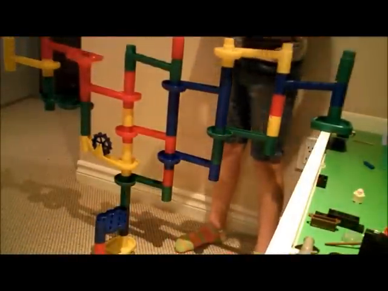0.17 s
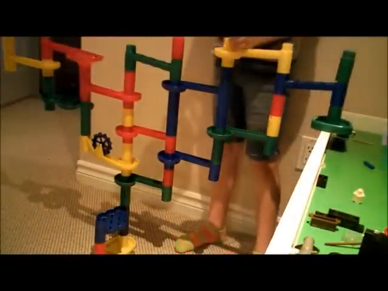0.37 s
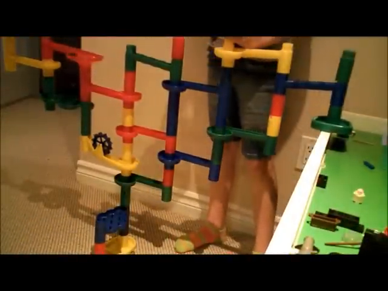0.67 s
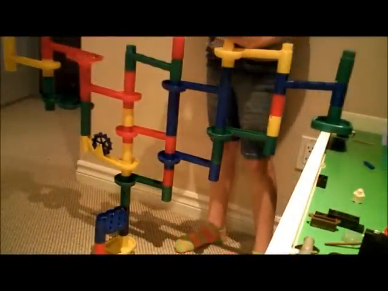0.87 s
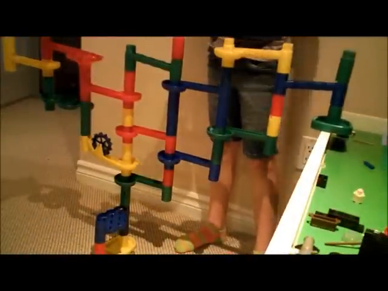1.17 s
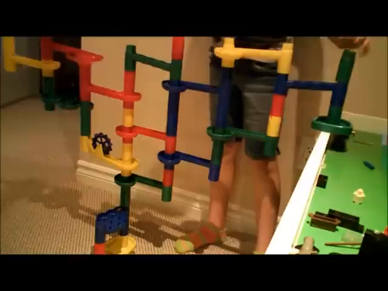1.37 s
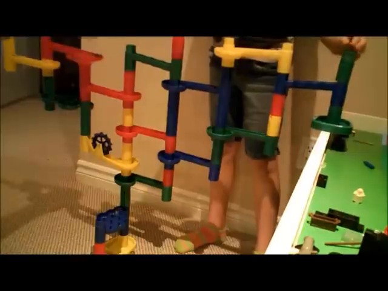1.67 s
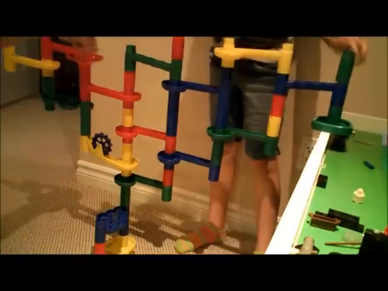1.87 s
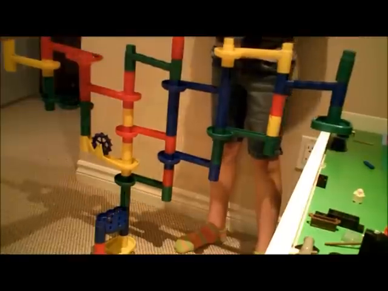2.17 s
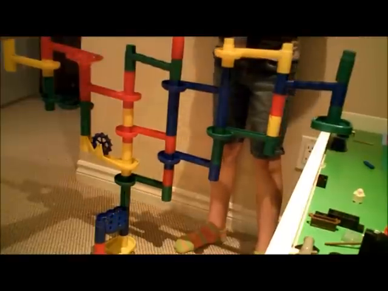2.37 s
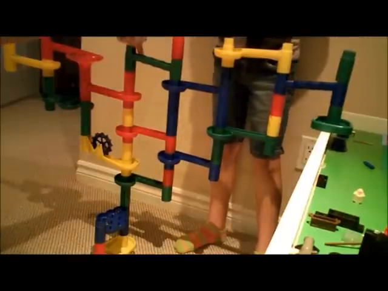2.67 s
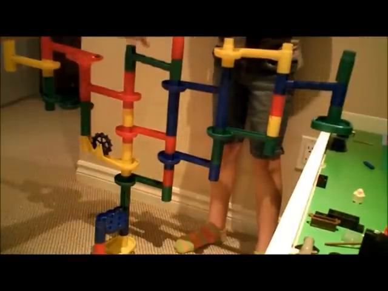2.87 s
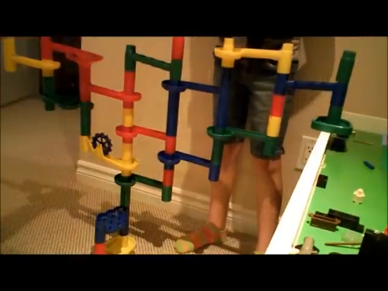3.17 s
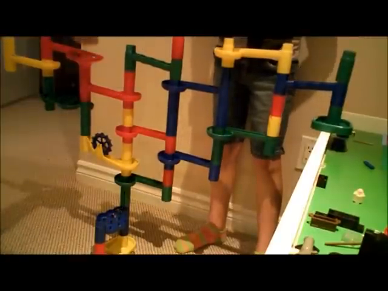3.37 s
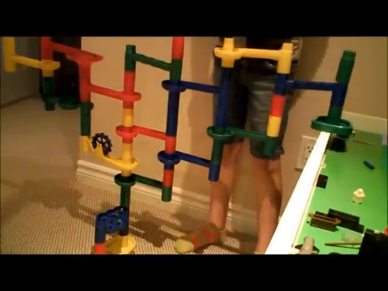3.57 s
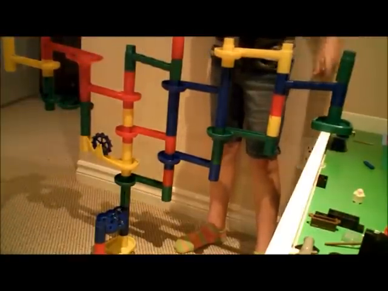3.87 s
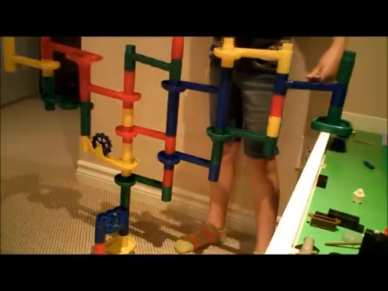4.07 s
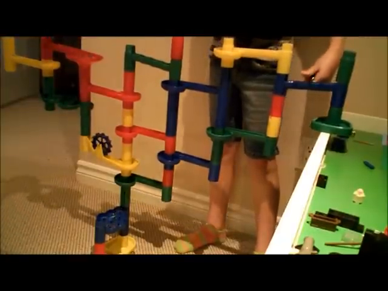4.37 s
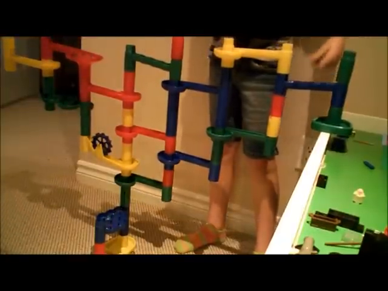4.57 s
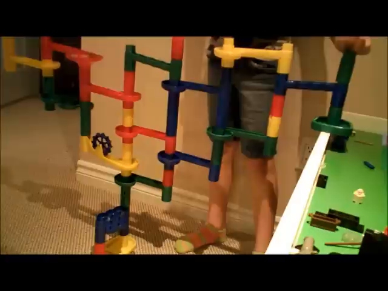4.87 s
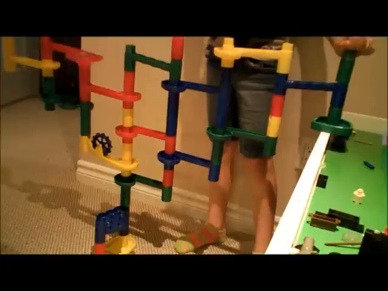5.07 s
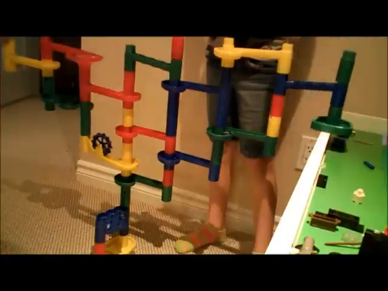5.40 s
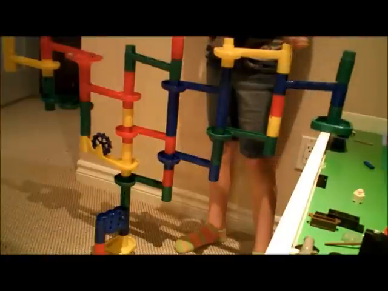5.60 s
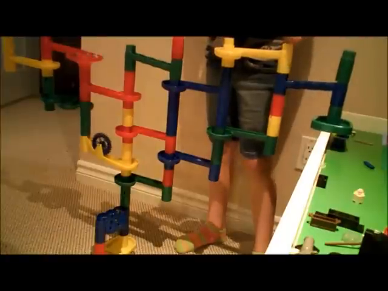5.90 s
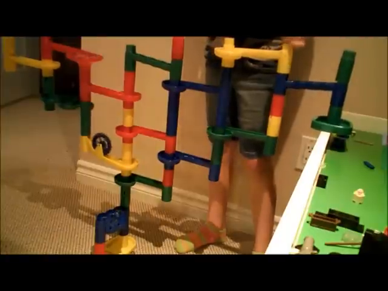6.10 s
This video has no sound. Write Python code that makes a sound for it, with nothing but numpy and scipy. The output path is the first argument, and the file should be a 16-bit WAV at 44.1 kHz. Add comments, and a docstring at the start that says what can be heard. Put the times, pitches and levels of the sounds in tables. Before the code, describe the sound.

Marbles clatter down a plastic marble run in a small room, with dense hollow knocks, glassy clicks and a soft rolling rumble.

```python
"""Marbles in a plastic tower

Marbles run down a plastic tower in a small carpeted room, heard through one camera microphone.
Rolling contact makes the chutes rumble and a bowl hum; light impacts chatter on the walls and click,
glass on glass. Drops through the tubes excite the plastic's modes in bouncing knocks. Now and then
a single mode thuds or pings, and stick-slip friction makes a joint squeak once."""
import sys
import numpy as np
from scipy import signal
from scipy.fft import rfft, irfft
from scipy.io import wavfile

SR = 44100
rng = np.random.default_rng(int(sys.argv[2]) if len(sys.argv) > 2 else 0)


def file_out(sig):
    """Save sig as 16-bit WAV at sys.argv[1]."""
    # one column per channel
    cols = np.atleast_2d(sig).T
    # limit, then scale
    lim = np.clip(cols, -1, 1)
    pcm = np.round(lim * 32767).astype(np.int16)
    wavfile.write(sys.argv[1], SR, pcm)


N = 275184
TIME = np.arange(N) / SR


def amp(db):
    """Decibels to amplitude ratio."""
    return 10 ** (np.asarray(db) / 20)


def unit_energy(x):
    """Normalise to an energy of one."""
    return x / np.sqrt(np.sum(x ** 2))


def unit_rms(x):
    """Normalise to an rms of one."""
    return x / np.std(x)


def band(x, hz, kind, order=2):
    """Butterworth filter."""
    return signal.sosfilt(signal.butter(order, hz, kind, fs=SR, output="sos"), x)


def response(spectrum, size=2048):
    """Minimum-phase impulse response of a (frequency [Hz], gain [dB]) curve, by cepstral folding."""
    hz, db = np.transpose(spectrum)
    bin_hz = np.fft.rfftfreq(size, 1 / SR)
    log_gain = np.log(amp(np.interp(np.log(bin_hz + 1), np.log(hz), db)))
    fold = np.r_[1, np.full(size // 2 - 1, 2), 1, np.zeros(size // 2 - 1)]
    return irfft(np.exp(rfft(irfft(log_gain) * fold)))


def through(x, impulse_response):
    """Convolution, cut to the length of x."""
    return signal.fftconvolve(x, impulse_response)[:len(x)]


def resonate(x, modes):
    """Forced response of parallel modes, each (frequency [Hz], bandwidth [Hz], gain [dB])."""
    return sum(amp(db) * signal.lfilter(*signal.iirpeak(hz, hz / width, fs=SR), x)
               for hz, width, db in modes)


def add(out, start_s, x):
    """Superpose x on out from start_s on."""
    start = max(int(start_s * SR), 0)
    out[start:start + len(x)] += x[:len(out) - start]


def contacts(per_s, spread_db):
    """Shot noise: tiny impacts of uneven size at random moments."""
    sizes = amp(spread_db * np.minimum(rng.standard_normal(N), 2)) * rng.choice([-1, 1], N)
    return unit_rms(sizes * (rng.random(N) < per_s / SR))


def dense_modes(energy, t60, rise_s):
    """Modal overlap: each input of energy becomes noise that builds as the waves spread, then decays."""
    power = signal.lfilter([1], [1, -np.exp(-2 * np.log(1000) / (t60 * SR))], energy)
    power = signal.lfilter([1], [1, -np.exp(-1 / (rise_s * SR))], power)
    return rng.standard_normal(len(power)) * np.sqrt(power * energy.sum() / power.sum())


def wander(x, modes, depth_db, moves_per_s):
    """Modal coupling depends on position: a moving marble favours now one mode, now another."""
    stops = np.arange(0, TIME[-1] + 1, 1 / moves_per_s)
    out = 0
    for mode in modes:
        coupling_db = depth_db * np.interp(TIME, stops, rng.uniform(-1.2, 1, len(stops)))
        out = out + amp(coupling_db) * resonate(x, [mode])
    return out


# spectrum of the still room: (frequency [Hz], relative level [dB])
ROOM_SPECTRUM = [(30, -12), (70, -15.5), (120, -1), (180, -5), (400, -3.5), (600, 4.5), (900, -9),
                 (2000, -30), (8000, -16), (15000, -40)]


def room_tone(db=-69.5):
    """Stationary noise: the faint, low hush of the room."""
    return amp(db) * unit_rms(through(rng.standard_normal(N), response(ROOM_SPECTRUM)))


def reflections(early_db=-7, late_db=-6.5, build_s=0.012, crossover_hz=4500):
    """Room impulse response: the near wall and table, then a diffuse tail whose treble decays first."""
    impulse = signal.unit_impulse(SR // 2)
    early = dense_modes(impulse, t60=0.0036, rise_s=build_s / 2)
    low = band(dense_modes(impulse, t60=0.41, rise_s=build_s), crossover_hz, "lowpass")
    high = band(dense_modes(impulse, t60=0.3, rise_s=build_s), crossover_hz, "highpass")
    return amp(early_db) * unit_energy(early) + amp(late_db) * unit_energy(low + high)


def reverberate(x, moves_per_s=7, places=4):
    """Multipath propagation: the sound shifts among places on the tower, each with its own reflections."""
    stops = np.arange(0, TIME[-1] + 1, 1 / moves_per_s)
    shares = np.array([np.interp(TIME, stops, rng.exponential(size=len(stops))) for _ in range(places)])
    shares = shares / np.linalg.norm(shares, axis=0)
    return x + sum(through(x * share, reflections()) for share in shares)


# drive from the rolling marbles: (time [s], relative level [dB])
ROLLING_LEVELS = [(0.0, -36), (0.19, -48.5), (0.4, -47.5), (0.68, -46.5), (1.01, -44), (1.32, -46.5),
                  (2.07, -38), (2.54, -38.5), (2.8, -36.5), (3.11, -36.5), (3.27, -42.5), (3.42, -44.5),
                  (3.62, -42), (4.08, -44.5), (4.3, -45), (4.55, -44.5), (5.07, -48), (5.25, -35),
                  (5.37, -41), (5.61, -46), (5.79, -41), (6.24, -39.5)]


def agitation(rattle_db=-18, settle_t60=0.32):
    """Incoherent sources add in power: the envelope of rolling plus a dying rattle after each knock."""
    times, levels_db = np.transpose(ROLLING_LEVELS)
    power = amp(np.interp(TIME, times, levels_db)) ** 2
    settling = amp(-60 * TIME[:SR] / settle_t60)
    for start_s, db, *_ in KNOCKS:
        add(power, start_s, (amp(db + rattle_db) * settling) ** 2)
    return np.sqrt(power)


# spectrum of rolling contact: (frequency [Hz], relative level [dB])
ROLLING_SPECTRUM = [(60, -32), (120, -21), (170, -21.5), (350, -14), (560, -3), (680, -6), (900, -2),
                    (1100, 3), (1400, 0), (1850, -0.5), (2300, -3.5), (4000, -8.5), (8000, -40),
                    (16000, -39)]
# resonances of the chutes: (frequency [Hz], bandwidth [Hz], gain [dB])
CHUTE_MODES = [(295, 18, 2), (527, 44, 5), (724, 32, 7.5), (1100, 9.6, 4), (1350, 260, 10), (1420, 20, -4),
               (1527, 114, 11.5), (1633, 46, 5), (1781, 170, 13.5), (1870, 320, 4), (2200, 78, -4),
               (2700, 92, 11), (3580, 120, -8), (3650, 68, 3), (4660, 1200, 4.5), (7140, 33, -16)]


def rolling(rumble_db=-7, chute_db=-8):
    """Roughness excitation: marbles drum over the track's fine bumps and drive the chutes' modes."""
    rumble = unit_rms(through(contacts(per_s=1500, spread_db=1.5), response(ROLLING_SPECTRUM)))
    chutes = unit_rms(wander(rumble, CHUTE_MODES, depth_db=4, moves_per_s=8))
    return agitation() * (amp(rumble_db) * rumble + amp(chute_db) * chutes)


# spectrum of struck plastic: (frequency [Hz], relative level [dB])
IMPACT_SPECTRUM = [(30, -31), (120, -29.5), (250, -26.5), (500, -13.5), (850, -6.5), (1100, -4), (1600, -4),
                   (2400, -0.5), (3500, 2), (5000, -1.5), (7500, -6.5), (10500, -13.5), (14000, -25),
                   (16000, -34)]


def chatter(db=-53.5, growth=1.94, relative_width=0.18, tilt_db_per_octave=3):
    """Light random impacts ring in narrow bands: lower on the plastic walls, highest glass on glass."""
    effort = agitation()
    # busier marbles tick harder, up to a limit
    strength = amp(db) * np.minimum(effort / effort.mean(), 2.2) ** growth
    out = 0
    for hz in np.geomspace(2000, 10000, 8):
        impacts = contacts(per_s=90, spread_db=7) * strength
        ticks = dense_modes(impacts ** 2, t60=0.012, rise_s=0.00056)
        tilt_db = tilt_db_per_octave * np.log2(hz / 4000)
        out = out + resonate(ticks, [(hz, relative_width * hz, tilt_db)])
    return through(out, unit_energy(response(IMPACT_SPECTRUM)))


# resonances of the bowl: (frequency [Hz], bandwidth [Hz], gain [dB])
BOWL_MODES = [(713, 71, -7), (960, 34, -18), (1095, 60, 4), (1165, 90, 1.5), (1330, 160, -3), (1512, 50, 0),
              (1780, 130, -1.5), (2140, 290, -0.5)]
# marbles circling it: (start [s], duration [s], relative hum level [dB], relative hiss level [dB])
BOWL_PASSES = [(2.515, 0.3, -31.5, -32), (2.86, 0.22, -33, -42), (3.048, 0.26, -31.5, -39)]


def bowl(db=-2, swell_s=0.13, fade_s=0.12):
    """Forced vibration: a circling marble scours a thin, humming bowl too small to radiate bass."""
    ringing = wander(contacts(per_s=600, spread_db=4), BOWL_MODES, depth_db=5.5, moves_per_s=13)
    hum = unit_rms(band(ringing, [600, 3200], "bandpass"))
    scour = through(contacts(per_s=900, spread_db=4.5), response(IMPACT_SPECTRUM))
    hiss = unit_rms(band(scour, [2200, 11000], "bandpass", order=1))
    out = 0
    for start_s, length_s, hum_db, hiss_db in BOWL_PASSES:
        age = TIME - start_s
        power = np.clip(np.minimum(age / swell_s, (length_s - age) / fade_s), 0, 1)
        out = out + np.sqrt(power) * (amp(hum_db) * hum + amp(hiss_db) * hiss)
    return amp(db) * out


# partials of the squeak: (harmonic number, relative level [dB])
SQUEAK_HARMONICS = [(1, 0), (2, -1), (3, -10), (4, -7), (7, -20), (8, -19)]


def squeak(start_s=4.282, length_s=0.032, start_hz=1120, sag_hz_per_s=1800, waver=0.02, db=-37.5):
    """Stick-slip friction: an unsteady harmonic tone whose pitch sags as the joint comes to rest."""
    age = np.clip(TIME - start_s, 0, length_s)
    jitter = unit_rms(band(rng.standard_normal(N), 330, "lowpass"))
    hz = (start_hz - sag_hz_per_s * age) * (1 + waver * jitter)
    phase = 2 * np.pi * np.cumsum(hz) / SR
    tone = unit_rms(sum(amp(partial_db) * np.sin(k * phase) for k, partial_db in SQUEAK_HARMONICS))
    return amp(db) * tone * np.sin(np.pi * age / length_s)


# single parts ringing: (time [s], relative level [dB], frequency [Hz], T60 [s], rise time [s])
THUDS_AND_PINGS = [(2.059, -32.5, 527, 0.13, 0.0033), (2.447, -32.5, 492, 0.017, 0.00083),
                   (2.449, -45, 387, 0.18, 0.003), (2.45, -42, 283, 0.11, 0.002),
                   (2.857, -24, 1180, 0.05, 0.003), (2.955, -32, 711, 0.15, 0.01),
                   (2.968, -27, 1070, 0.052, 0.0031), (3.062, -26, 1750, 0.11, 0.005),
                   (3.124, -23, 1137, 0.1, 0.0067), (3.877, -27, 4940, 0.016, .0005),
                   (3.878, -45, 4950, 0.46, .001), (4.143, -29, 1082, 0.05, 0.003),
                   (4.47, -27.5, 1063, 0.17, .008), (4.7, -41, 690, 0.03, 0.0019),
                   (4.919, -42, 560, 0.02, 0.0014), (4.922, -33, 1445, 0.028, 0.0026),
                   (5.228, -43.5, 309, 0.18, 0.0055), (5.263, -37.5, 538, 0.32, 0.004),
                   (5.79, -24.5, 1420, 0.24, 0.025)]


def thuds_and_pings():
    """Damped free vibration of one mode of the tower; the softer the contact, the slower the rise."""
    out, t = np.zeros(N), TIME[:SR // 2]
    for start_s, db, hz, t60, rise_s in THUDS_AND_PINGS:
        envelope = amp(-60 * t / t60) * (1 - np.exp(-t / rise_s))
        mode = envelope * np.sin(2 * np.pi * hz * t)
        add(out, start_s, amp(db) * unit_energy(band(mode, hz / 2, "highpass", order=4)))
    return out


# bright clicks: (time [s], energy level [dB], centre frequency [Hz]); mostly glass on glass, but the two at
# 4.6993 s and 5.262 s are the sharp snap of the knocks there
BRIGHT_CLICKS = [(0.2993, -36, 5200), (1.6792, -44, 5600), (1.7305, -20, 7540), (1.8069, -52, 5000),
                 (1.9451, -24, 5200), (2.0135, -15, 5400), (2.3731, -32, 6000), (2.4933, -20, 6500),
                 (2.6043, -10, 6540), (3.3943, -29, 7500), (3.465, -19, 6600), (3.752, -29, 7700),
                 (3.7949, -32, 8500), (3.849, -21.5, 8300), (4.0043, -27, 9000), (4.254, -19.5, 9000),
                 (4.4145, -27, 8000), (4.4619, -22, 7900), (4.6993, -7, 6040), (5.262, -4, 5530),
                 (5.4172, -18.5, 7500), (5.6392, -19, 7500), (5.6851, -14, 7800), (6.1518, -8.5, 8300)]


def bright_clicks(relative_width=0.63):
    """Hard, brief contact: a bright click with no body, mostly one marble catching up with another, and twice
    the sharp snap of a hard knock."""
    out = np.zeros(N)
    for start_s, db, hz in BRIGHT_CLICKS:
        burst = dense_modes(signal.unit_impulse(SR // 16), t60=0.009, rise_s=0.0004)
        click = through(burst, response(IMPACT_SPECTRUM))
        mode = [(hz, relative_width * hz, 0)]
        add(out, start_s, amp(db) * unit_energy(resonate(resonate(click, mode), mode)))
    return out


def rebounds(first_db, lead_s, gap_s=0.0074, loss_db=6, graze_db=-16, count=6):
    """Inelastic bouncing: the energy of a graze, the blow at lead_s, then ever weaker, uneven rebounds."""
    train, blow = np.zeros(SR // 8), int(lead_s * SR)
    train[int(blow * rng.uniform(0, 0.6))] = amp(graze_db)
    train[blow] = 1
    for k, delay_s in enumerate(np.cumsum(gap_s * rng.uniform(0.43, 2, count))):
        train[min(blow + int(delay_s * SR), len(train) - 1)] += amp(first_db - loss_db * k)
    return train ** 2


# modes of a struck part: (ratio to its ring frequency, gain [dB])
RING_MODES = [(0.999, 3), (1.41, -6), (2.3, -10.5)]
# marble drops: (time [s], relative level [dB], hollow body gain [dB], ring frequency [Hz],
# first rebound against the blow [dB])
KNOCKS = [(0.008, -35.5, 2.5, 2200, -7), (0.0559, -28.5, -2.5, 2150, -6), (0.118, -27, -6.5, 2140, -6),
          (0.3653, -37, -2, 3750, -28), (0.399, -36.5, -3, 1740, -8), (0.4785, -40.5, 1, 1420, -15),
          (0.5801, -38, 0.5, 1220, -14), (0.6844, -29.5, -6.5, 2920, -12), (0.715, -32.5, -9, 2270, 5),
          (0.7479, -25, -8, 1580, -9), (0.755, -25, -5, 3100, -7), (0.766, -25, -9, 1320, -2),
          (0.778, -28, -9, 3180, -3), (0.788, -22, -9, 1950, -8), (.831, -30, -18, 1390, -17),
          (0.9071, -26.5, -25, 5170, -10), (.9725, -19.5, -8.5, 1700, -7), (.981, -20, -8, 3240, -21),
          (.993, -29, 0.5, 1500, -10), (1.013, -18, -9.5, 1470, -6), (1.067, -18.5, -6, 2010, -7),
          (1.0792, -17.5, -10.5, 3000, -11), (1.089, -23.5, -10, 1860, -13), (1.108, -28, -10, 1690, -12),
          (1.2082, -33, -1.5, 1550, -25), (1.41, -38, 5.5, 1580, -10), (1.449, -35, -3, 3070, 1),
          (1.457, -21, -7, 3600, -9), (1.567, -24.5, -2, 2550, -4), (1.65, -30, -8, 1620, -2),
          (1.8614, -24.5, -6.5, 2450, -22), (1.9051, -22, -8.5, 1460, -9), (2.037, -19.5, -5, 4000, 3),
          (2.059, -13.5, -10.5, 4110, -12), (2.1, -24.5, -15, 2680, -12), (2.108, -21.5, -15, 1740, -9),
          (2.12, -24, -9, 1970, -12), (2.2302, -22, -8.5, 1610, -3), (2.2603, -26.5, -5.5, 1550, -8),
          (2.321, -34.5, 0, 1480, -12), (2.5227, -26.5, -17, 3160, -5), (2.601, -25.5, -7, 2080, -11),
          (2.7027, -25.5, 3.5, 2100, -30), (2.8115, -17.5, -16, 3970, -25),
          (2.8155, -12.5, -13.5, 3860, -17), (2.929, -23, -4.5, 1750, -10), (2.9426, -19.5, -22, 1670, -16),
          (2.956, -26, -8, 1760, -15), (3.038, -17, -19, 2350, -15), (3.048, -17.5, -6.5, 3300, -12),
          (3.1412, -24, -33, 2600, -26), (3.1851, -21, -16, 2290, -17), (3.331, -30.5, -8.5, 1510, -25),
          (3.452, -33, 3, 1320, 0), (3.483, -18.5, -7.5, 1695, -12), (3.525, -26, -4, 1715, 7),
          (3.582, -17.5, -10.5, 3400, -10), (3.61, -25, -10, 2310, 0), (3.766, -30, -11, 3870, -19),
          (3.8754, -21.5, -3.5, 4790, -9), (4.0034, -31, -5.5, 1490, -4), (4.1372, -23, -6.5, 3760, -6),
          (4.1511, -24, -5, 3480, -17), (4.1799, -25, -12, 3960, -7), (4.336, -32.5, -8, 2680, -23),
          (4.3665, -33.5, -4, 1280, -19), (4.4224, -22.5, -5, 3940, -4.5), (4.4707, -24.5, -7.5, 2800, -5),
          (4.486, -22, -5, 2300, 0), (4.5397, -24, -8, 1325, -7), (4.565, -28, -9, 1480, -17),
          (4.663, -30.5, -6, 1280, -3), (4.6985, -17, -9, 2840, -31), (4.7097, -19, -19, 1810, -37),
          (4.7485, -24, -7, 1670, -31), (4.839, -32, -3, 1330, -3), (4.919, -41, 2, 1440, -10),
          (5.0179, -35, -1, 1250, -5), (5.0606, -27, -4.5, 1340, -8), (5.099, -30.5, -5.5, 2200, -8),
          (5.1069, -20, -5.5, 3700, -16), (5.1159, -19, -13.5, 2020, -22), (5.1572, -26, -20, 1720, -12),
          (5.2225, -29.5, -2, 1650, -8), (5.24, -27.5, -8, 4220, -15), (5.2597, -17, -13, 4350, -17),
          (5.272, -21.5, -6, 1820, -5), (5.3004, -19.5, -6, 1480, -6), (5.332, -27.5, -9, 1480, -13),
          (5.542, -30, -1.5, 1630, 0), (5.5918, -26.5, -3.5, 3900, -7), (5.6202, -22.5, -4, 2090, -9),
          (5.677, -21.5, -10, 1410, -8), (5.685, -23.5, -6, 3820, -13), (5.696, -26, -6, 1650, -14),
          (5.7121, -18.5, -10.5, 1670, -5), (5.7634, -28, -20, 2250, -8), (5.7867, -25.5, -10, 1390, -5),
          (5.801, -28, -12, 2580, -3), (5.852, -23.5, -7.5, 1340, -4), (5.879, -25.5, -3.5, 1760, -5),
          (5.9028, -15.5, -13, 1720, -12), (5.916, -21, -9, 2750, -5), (5.932, -18.5, -7, 1850, -4),
          (6.1367, -21.5, -8, 1560, -5), (6.1513, -20, -17, 4440, -10), (6.162, -22, -11.5, 1480, -1)]


def knocks(lead_s=0.008, crack_rise_s=0.00075, ring_rise_s=0.0022, relative_width=0.064, chute_db=-9):
    """Impact excitation: each drop gives a crack of dense modes, the struck part's ring and a tube note."""
    out, colour = np.zeros(N), response(IMPACT_SPECTRUM)
    for start_s, db, body_db, hz, rebound_db in KNOCKS:
        blows = rebounds(rebound_db, lead_s)
        body = band(dense_modes(blows, 0.3, 2 * crack_rise_s), 2300, "lowpass", order=4)
        middle = band(dense_modes(blows, 0.02, crack_rise_s), [2200, 6200], "bandpass", order=3)
        treble = band(dense_modes(blows, 0.019, crack_rise_s), 6000, "highpass", order=4)
        modes = [(ratio * hz, relative_width * hz, mode_db) for ratio, mode_db in RING_MODES]
        ring = resonate(dense_modes(blows, 0.031, ring_rise_s), modes)
        tube_hz = 1730 * (1 + 0.1 * rng.standard_normal())  # the hollow tubes differ a little
        tube = resonate(dense_modes(blows, 0.1, ring_rise_s), [(tube_hz, 140, 0)])
        recording_bump = band(dense_modes(blows, 0.06, ring_rise_s), 80, "lowpass")
        # a part that rings higher is stiffer: a brighter crack and a clearer note
        octaves = np.log2(hz / 2000)
        treble_db, ring_db = -10 + 2 * octaves, -5 + 1.5 * octaves
        layers = [(body, body_db + 4), (middle, -1.2), (treble, treble_db),
                  (ring, ring_db), (tube, -11), (recording_bump, -43)]
        knock = sum(amp(layer_db) * unit_energy(through(x, colour)) for x, layer_db in layers)
        add(out, start_s - lead_s, amp(db) * knock)
    # the joined chutes and tubes ring in sympathy with every blow
    return out + amp(chute_db) * np.std(out) * unit_rms(resonate(out, CHUTE_MODES))


def scene(knock_db=17, thud_and_ping_db=20):
    """Superposition: the tower's sources reverberate together over the room tone."""
    tower = amp(knock_db) * knocks() + bright_clicks() + rolling() + chatter() + bowl()
    tower += amp(thud_and_ping_db) * thuds_and_pings() + squeak()
    return (room_tone() + reverberate(tower))[None]


def record(dry):
    """Band limiting: the camera cuts off the highest treble."""
    return signal.sosfilt(signal.ellip(10, 0.2, 80, 15800, fs=SR, output="sos"), dry)


dry = scene()
out = record(dry)
file_out(out)
```